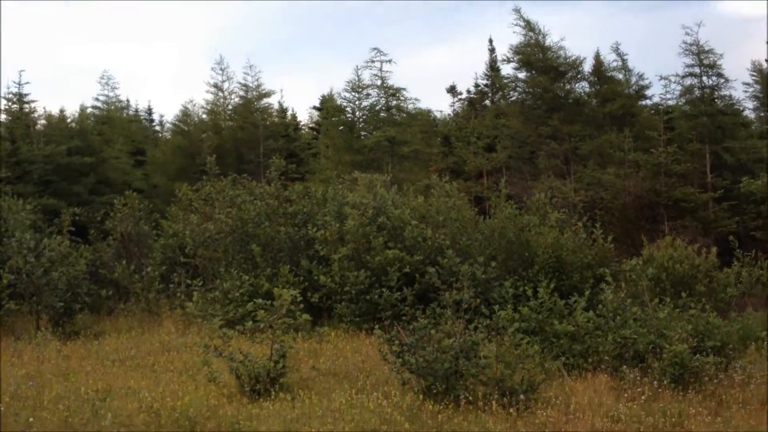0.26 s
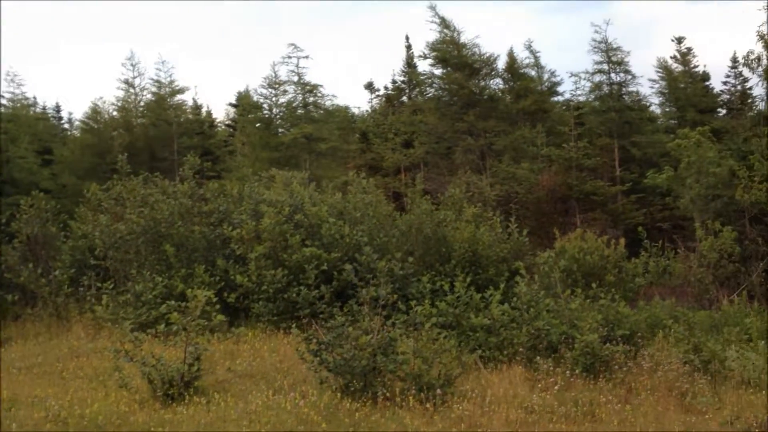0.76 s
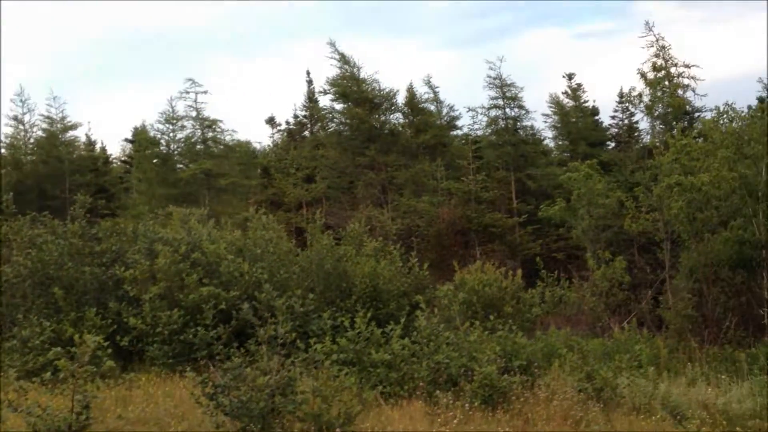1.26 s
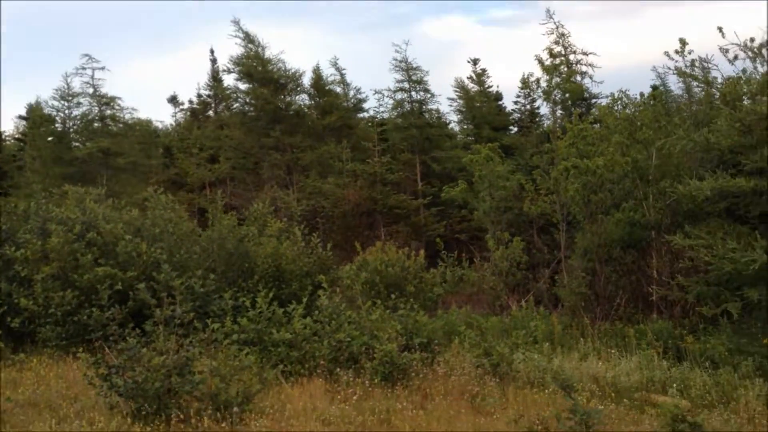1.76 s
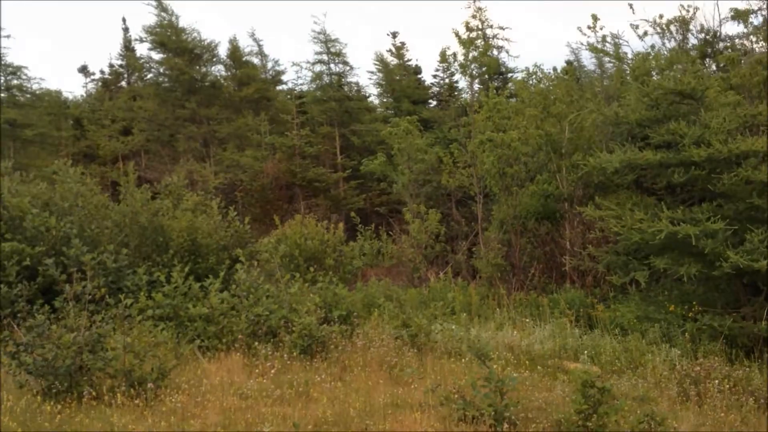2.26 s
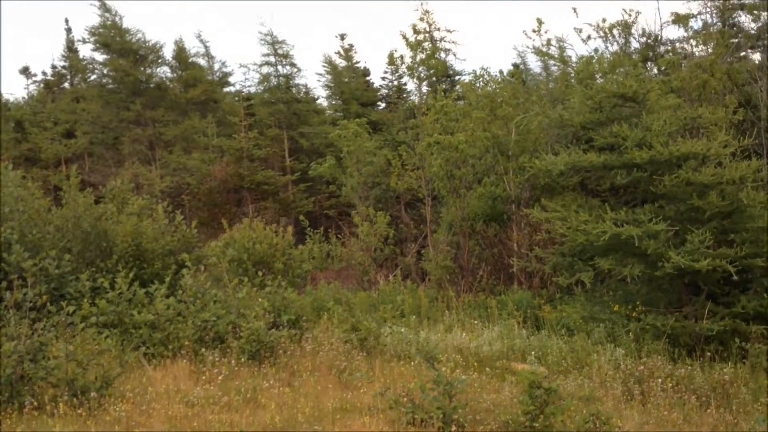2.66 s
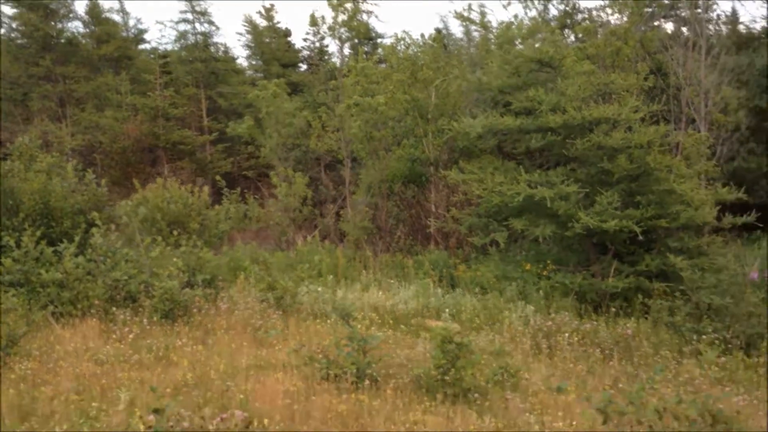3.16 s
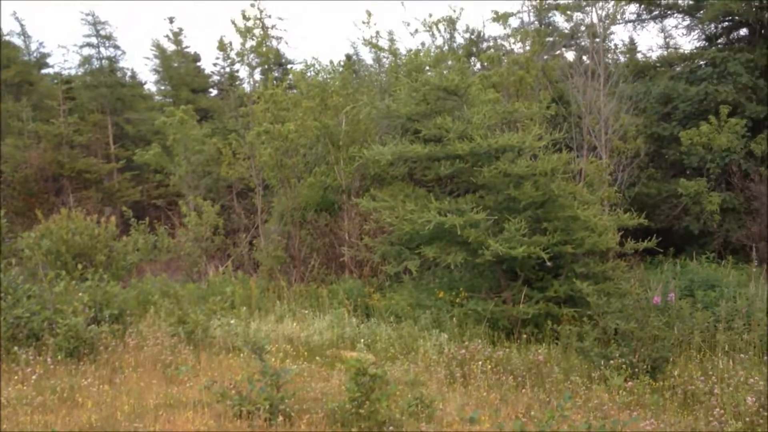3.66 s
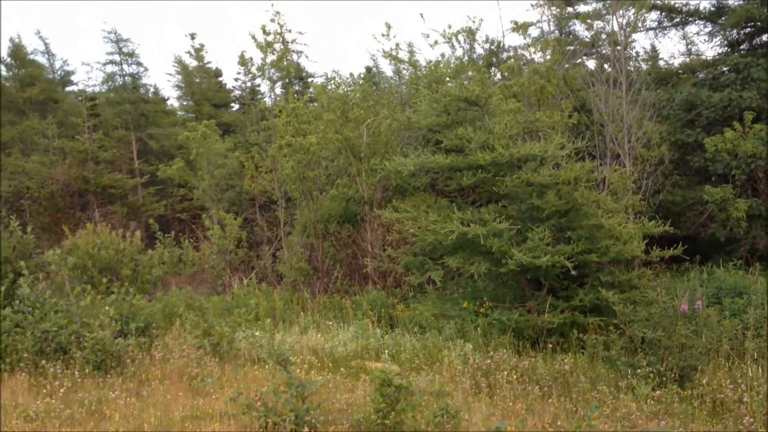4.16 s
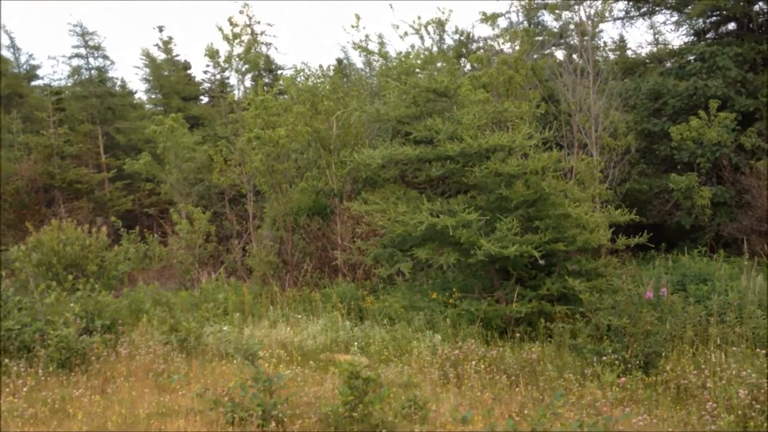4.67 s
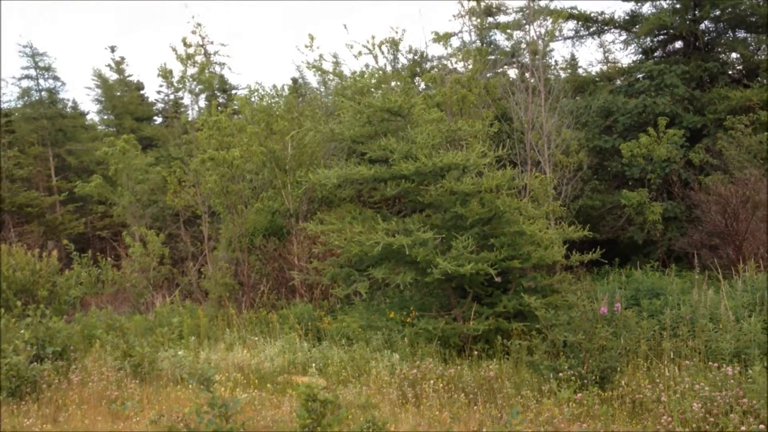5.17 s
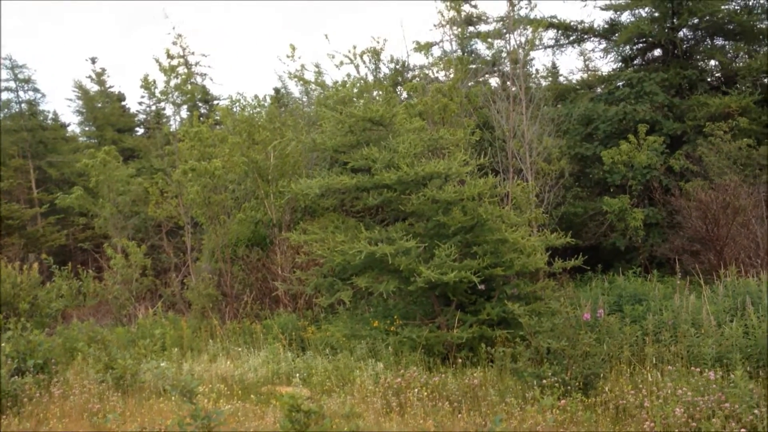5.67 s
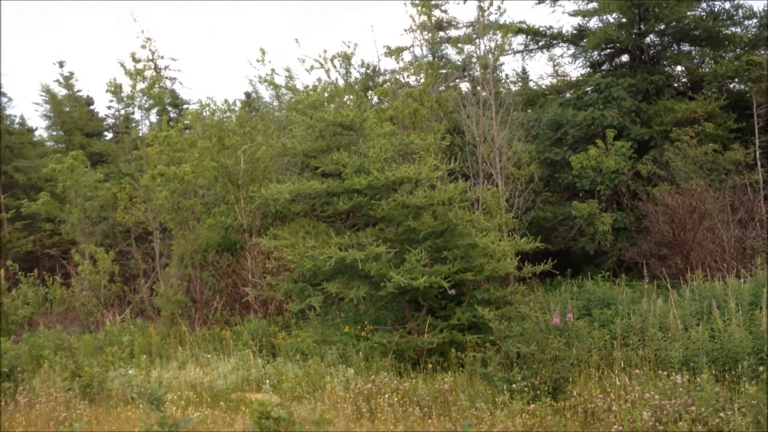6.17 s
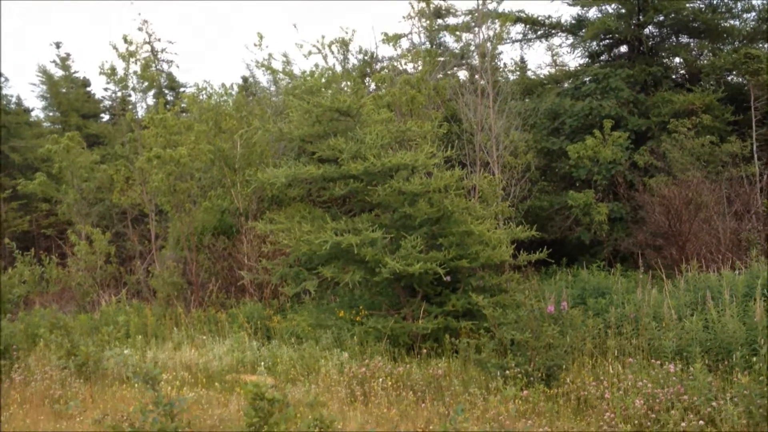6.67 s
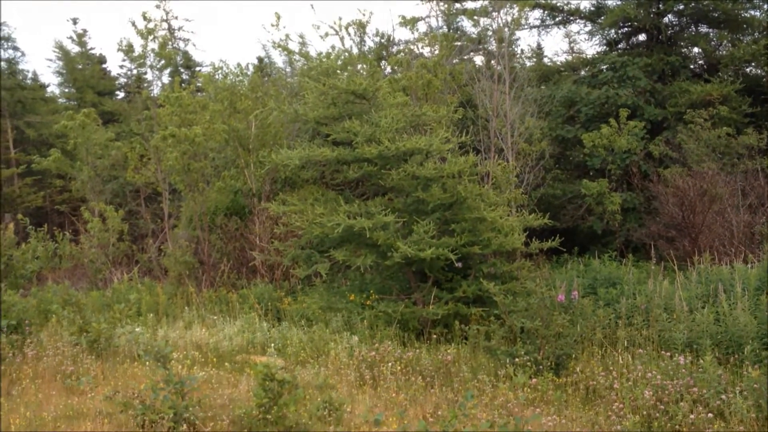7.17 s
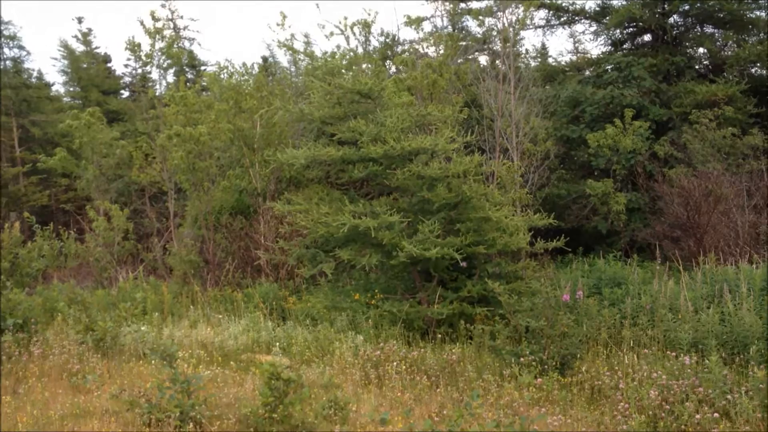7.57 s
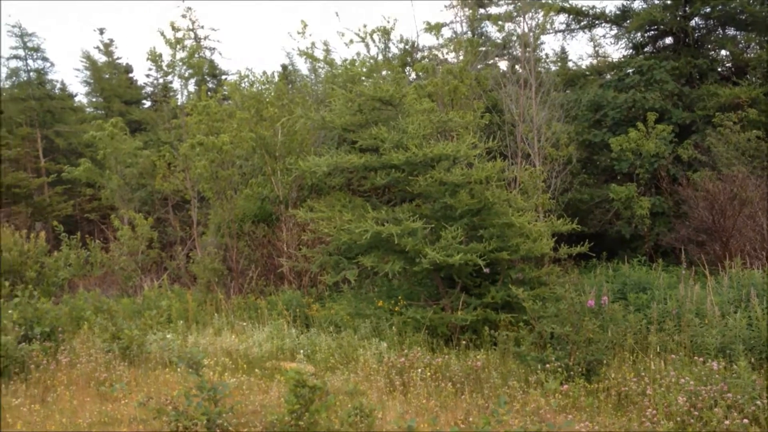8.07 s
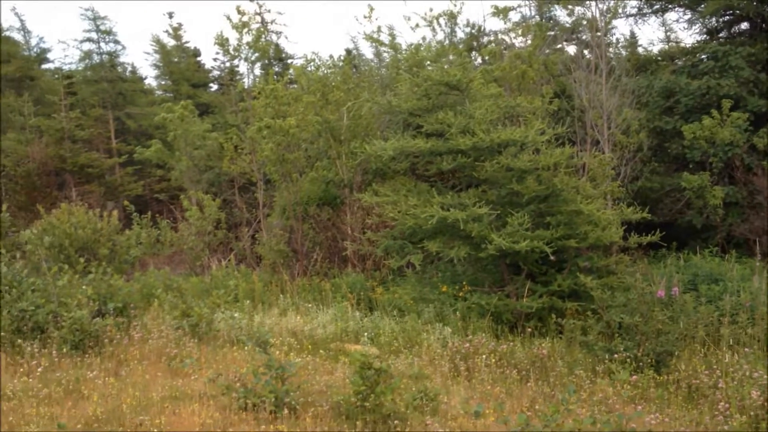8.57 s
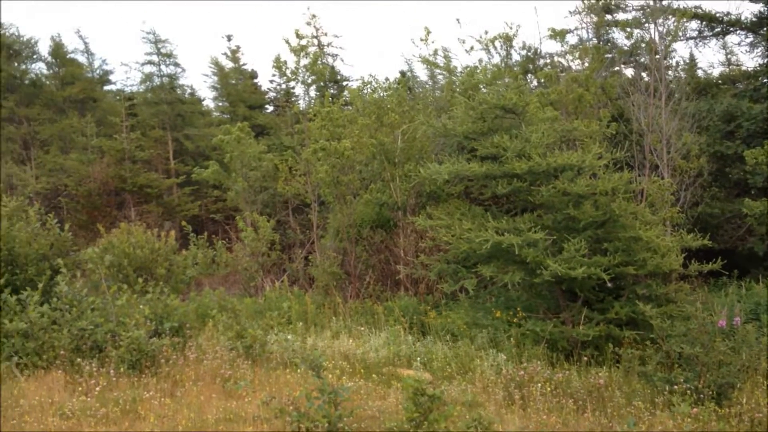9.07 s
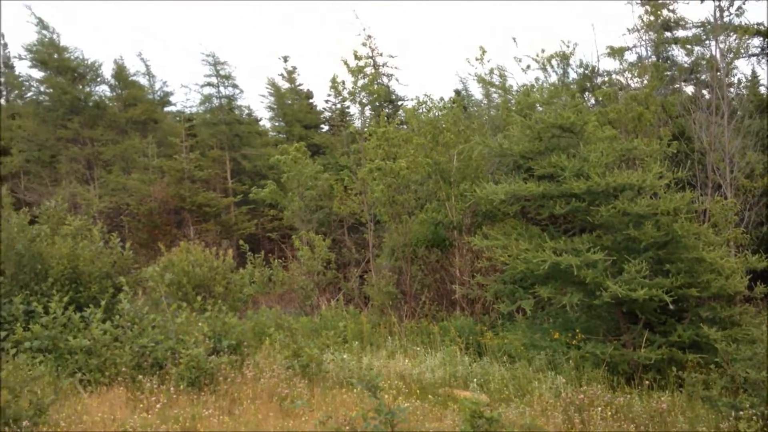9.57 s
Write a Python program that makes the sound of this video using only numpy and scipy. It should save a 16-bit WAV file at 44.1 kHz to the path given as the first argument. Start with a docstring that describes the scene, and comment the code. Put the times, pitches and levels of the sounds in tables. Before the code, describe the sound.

Hoarse, drawn-out hound howls break into thin squeals and ring through the woods, between quiet gaps with small birds and soft microphone bumps.

```python
"""Young hounds baying in the brush

Hounds bay at the edge of a wood: long falling howls, built from vocal-fold harmonics, turn hoarse with
growl and rasp and break into a second, whistling voice of gliding tones. Sparse echoes scatter the
calls among the trees and ring on. Birds chip in high glides; shaped noise makes rustling leaves, scuffs
and air; puffs bump the microphone with short dull swings, and small hollow knocks ring in the brush."""
import sys
import numpy as np
from scipy import signal
from scipy.fft import rfft, irfft, next_fast_len
from scipy.io import wavfile

SR = 44100
rng = np.random.default_rng(int(sys.argv[2]) if len(sys.argv) > 2 else 0)


def waveform_to_disk(signal):
    """Save audio, clipped to [-1, 1], as 16-bit WAV at the path in sys.argv[1]."""
    frames = np.transpose(np.atleast_2d(signal))
    scaled = np.clip(frames, -1, 1) * 32767
    samples = np.round(scaled).astype(np.int16)
    wavfile.write(sys.argv[1], SR, samples)


N = 433062
TIME = np.arange(N) / SR


def amp(db):
    """Decibels to gain."""
    return 10 ** (np.asarray(db) / 20)


def unit(x):
    """Scales to rms 1."""
    return x / np.sqrt(np.mean(x ** 2) + 1e-20)


def read(points, hz):
    """Reads a spectrum or decay table on a log-frequency axis."""
    f, value = np.transpose(points)
    return np.interp(np.log(hz + 1), np.log(f + 1), value)


def curves(rows):
    """Time axis of a table, then each of its columns sample by sample."""
    s, *columns = np.transpose(rows)
    t = np.arange(s[0], s[-1], 1 / SR)
    return [t] + [np.interp(t, s, column) for column in columns]


def add(mix, s, sound):
    """Mixes a sound in at time s."""
    part = mix[max(round(s * SR), 0):][:len(sound)]
    part += sound[:len(part)]


def noise(size=N):
    """White noise."""
    return rng.standard_normal(size)


def colour(x, points):
    """Gives x a spectrum, at rms 1."""
    size = next_fast_len(len(x))
    gain = amp(read(points, np.fft.rfftfreq(size, 1 / SR)))
    return unit(irfft(rfft(x, size) * gain, size)[:len(x)])


def wobble(size, hz):
    """Random motion, mostly slower than the given rate, at rms 1."""
    smooth = signal.butter(2, hz, fs=SR, output="sos")
    return unit(signal.sosfilt(smooth, noise(size + SR // 10))[-size:])


def fade(t, edge):
    """Straight fade-in and fade-out, each edge seconds long."""
    return np.clip(np.minimum(t - t[0], t[-1] - t) / edge, 0, 1)


# colour of still air and microphone hiss: f/Hz, relative level/dB
AIR_COLOUR = [(18, -40), (35, -23), (65, -20.5), (130, 1.5), (330, 1), (450, -0.5), (620, -1), (900, -3.5),
              (2000, -8.5), (3600, -10), (5500, -12), (10500, -18.5), (13000, -15), (15200, -12)]


def air(level_db=-68, sway_db=-0.64):
    """A faint, gently swaying hush of coloured noise."""
    return amp(level_db + sway_db * wobble(N, 3.6)) * colour(noise(), AIR_COLOUR)


# gusts on the microphone: t/s, rise/s, fall/s, strength/dB
GUST_SWELLS = [(3.3, 0.066, 0.21, -60), (4.6, 0.14, 0.12, -71), (6.44, 0.07, 0.48, -67),
               (7.05, 0.31, 0.43, -74.5)]


def breeze(calm_db=-89.5):
    """Strength of the breeze: each gust swells and dies away over the calm."""
    strength = amp(calm_db)
    for s, rise, fall, db in GUST_SWELLS:
        swell = np.exp(-np.maximum((s - TIME) / rise, (TIME - s) / fall))
        strength = strength + amp(db) * swell
    return strength


def rumble(flutter_db=5):
    """The breeze rumbles in lumps: low noise that flutters in strength."""
    low = colour(noise(), [(20, -42.5), (60, -4), (130, 0.0), (220, -5.5), (330, -31), (900, -61.5)])
    return breeze() * unit(low * amp(flutter_db * wobble(N, 9.3)))


# the strongest puffs of air, ahead of the microphone's bass cut: t/s, level/dB
PUFFS = [(3.254, -43.5), (3.311, -46.5), (3.345, -40), (3.44, -43.5), (4.578, -52), (4.648, -55.5),
         (6.458, -44), (7.119, -54), (7.506, -53), (7.639, -57)]


def bumps(bump_hz=150, length=0.0023):
    """Each puff of air gives a brief dull swing under a bell-shaped envelope; length in s."""
    out = np.zeros(N)
    t = np.arange(-SR // 20, SR // 20) / SR
    for s, db in PUFFS:
        swing = np.cos(2 * np.pi * (bump_hz * t + rng.random()))
        add(out, s + t[0], amp(db) * swing / np.cosh(t / length))
    return out


def wind():
    """Rumble and bumps through a microphone that hardly passes the deepest bass."""
    bass_cut = signal.butter(2, 60, "high", fs=SR, output="sos")
    return signal.sosfilt(bass_cut, rumble() + bumps())


# swells of rustling leaves: middle t/s, half length/s, level/dB
LEAF_SWELLS = [(6.3, 0.57, -83), (7.907, 0.76, -68.5), (8.756, 0.24, -71.5)]
# colour of the leaves: f/Hz, relative level/dB
LEAF_COLOUR = [(300, -7), (1500, 4), (3000, -2), (4200, -5), (6000, -7), (8000, -6), (10500, -21),
               (15000, -14)]


def rustles(grain_db=3, grain_hz=300):
    """Soft, bright swells of leaves brushing each other: grainy noise."""
    swell = sum(amp(db) * np.exp(-((TIME - s) / half) ** 2) for s, half, db in LEAF_SWELLS)
    grains = noise() * amp(grain_db * wobble(N, grain_hz))
    return swell * colour(grains, LEAF_COLOUR)


# scuffs and rustles close by: t/s, length/s, level/dB
SCUFF_STROKES = [(0.216, 0.054, -47), (0.068, 0.0085, -58.5), (4.294, 0.051, -63), (4.683, 0.055, -71),
                 (5.233, 0.11, -75), (5.555, 0.022, -65.5)]
# colour of the friction: f/Hz, relative level/dB
FRICTION_COLOUR = [(60, -32), (250, 2), (600, 5.5), (2000, -0.5), (3000, -4), (4400, -8.5), (5500, -22.5),
                   (8000, -19.5), (15000, -43)]


def scuffs(grain_db=3):
    """Short grainy strokes of friction."""
    out = np.zeros(N)
    for s, length, db in SCUFF_STROKES:
        size = int(length * SR)
        grains = noise(size) * amp(grain_db * wobble(size, 470))
        stroke = signal.windows.tukey(size, 0.6)
        add(out, s, amp(db) * stroke * colour(grains, FRICTION_COLOUR))
    return out


# small hollow knocks in the brush: t/s, f/Hz, level/dB
BRUSH_KNOCKS = [(4.33, 292, -57.5), (5.255, 638, -59), (5.563, 463, -56.5), (9.435, 718, -60)]


def knocks(t60=0.067, rise=0.0049):
    """One woody mode rings briefly at each knock; decay by 60 dB and rise in s."""
    out = np.zeros(N)
    t = np.arange(SR // 4) / SR
    for s, hz, db in BRUSH_KNOCKS:
        ring = (1 - np.exp(-t / rise)) * np.sin(2 * np.pi * hz * t)
        add(out, s, 2 * amp(db - 60 * t / t60) * ring)
    return out


# decay of the tail among the trunks: f/Hz, time to fall by 60 dB/s
TRUNK_T60 = [(400, 0.99), (1100, 1.06), (2100, 0.84), (4000, 0.46), (8000, 0.073)]


def woods(x, near_db=-9, near_t60=0.24, far_db=-14, far_rise=0.0092, scatter_hz=680):
    """Nearby brush scatters the sound almost at once; the trunks behind it return a long tail."""
    t = np.arange(SR * 3 // 2) / SR
    # sparse random echoes, about 2500 a second
    near, far = rng.standard_normal((2, len(t))) * (rng.random((2, len(t))) < 2500 / SR)
    near *= amp(-60 * t / near_t60) * (t > 0.004)
    # each frequency of the tail dies at its own pace
    hz, frame_s, bins = signal.stft(far * (1 - np.exp(-t / far_rise)), SR, nperseg=256)
    decay = amp(-60 * frame_s / read(TRUNK_T60, hz)[:, None])
    far = signal.istft(bins * decay, SR, nperseg=256)[1][:len(t)]
    echoes = amp(near_db) * near / np.linalg.norm(near) + amp(far_db) * far / np.linalg.norm(far)
    # twigs hardly scatter low notes
    echoes = signal.sosfilt(signal.butter(3, scatter_hz, "high", fs=SR, output="sos"), echoes)
    return x + signal.fftconvolve(x, echoes)[:N]


# bird notes: t/s, length/s, first f/Hz, last f/Hz, level/dB, depth of the warble/Hz
BIRD_NOTES = [(0.2, .03, 8460, 7600, -67, 2), (1.136, 0.15, 6970, 7300, -77, -3),
              (1.325, 0.17, 7250, 7460, -75.5, 108), (1.506, 0.2, 7430, 7420, -74, -5),
              (3.223, 0.032, 8420, 7600, -74, -16), (3.627, 0.19, 4100, 3850, -77, -6),
              (3.807, .17, 7580, 7310, -68.5, 372), (4.084, 0.1, 7720, 7400, -67.5, 274),
              (7.367, 0.052, 7450, 6670, -82, 0), (8.864, 0.037, 8650, 6200, -55.5, 2)]


def chip(s, length, first_hz, last_hz, level_db, warble_hz, jitter=0.02, flicker_db=3):
    """A small bird's thin, buzzy glide: a sine with a warble, a shaky pitch and a flickering level."""
    t = np.arange(0, length, 1 / SR)
    glide = first_hz + (last_hz - first_hz) * t / length
    hz = glide + warble_hz * np.cos(2 * np.pi * 18.3 * t)  # warble rate 18.3 Hz
    arch_db = -4.5 * (2 * t / length - 1) ** 2  # louder in the middle than at the ends
    phase = 2 * np.pi * np.cumsum(hz * (1 + jitter * wobble(len(t), 400))) / SR
    tone = unit(np.sin(phase) * amp(flicker_db * wobble(len(t), 60)))
    return s, amp(level_db + arch_db) * fade(t, 0.012) * tone


# colour of the hoarse rasp, in the bays and in their ring: f/Hz, relative level/dB
RASP_COLOUR = [(40, -80), (300, -52), (480, -26.5), (620, -3.5), (760, -10), (1050, -2), (1400, -7),
               (1800, -12.5), (2150, -7), (2650, -16.5), (2950, -45.5), (3500, -35.5), (4100, -41),
               (5000, -49.5), (7300, -43), (11000, -65)]


def dying_bay(level_db=-52, t60=1.29, squeal_hz=1290, squeal_width_hz=45, squeal_db=-4):
    """The ring of an earlier hoarse bay and of its squeal dies away among the trees."""
    squeal_ring = unit(wobble(N, squeal_width_hz) * np.sin(2 * np.pi * squeal_hz * TIME))
    ring = colour(noise(), RASP_COLOUR) + amp(squeal_db) * squeal_ring
    return amp(level_db - 60 * TIME / t60) * ring


# squeals, the thin second voice:
# t/s, rise/s, fall/s, first f/Hz, last f/Hz, level/dB, octave overtone level/dB
SQUEAL_NOTES = [(0.828, 0.02, 0.0095, 1270, 1014, -39.5, -5.5), (1.875, 0.023, .052, 1045, 985, -42, -4),
                (3.395, 0.017, 0.069, 1236, 827, -32, -24), (5.919, 0.014, 0.11, 1180, 1427, -40.5, -5),
                (6.25, 0.05, .06, 1366, 1265, -43.5, -15), (6.639, 0.083, .12, 1250, 1352, -49, -3),
                (7.401, 0.012, 0.063, 992, 991, -39.5, -19), (7.618, .012, .055, 1270, 1290, -57, -17),
                (7.711, 0.1, .16, 1375, 1290, -47.5, -9), (7.885, 0.0345, .33, 1411, 1265, -33, -18)]


def squeal(s, rise, fall, first_hz, last_hz, level_db, octave_db, jitter=0.016):
    """A nearly pure, unsteady tone with its octave, gliding toward its last pitch."""
    t = np.arange(0, rise + fall, 1 / SR)
    # the time constant of the glide is a share of the length
    hz = last_hz + (first_hz - last_hz) * np.exp(-t / (0.27 * t[-1]))
    swell_db = -25 * np.maximum(1 - t / rise, (t - rise) / fall)
    phase = 2 * np.pi * np.cumsum(hz * (1 + jitter * wobble(len(t), 120))) / SR
    tone = unit(np.sin(phase) + amp(octave_db) * np.sin(2 * phase))
    return s, amp(level_db + swell_db) * fade(t, 0.0046) * tone


# the voice breaks into hoarseness: middle t/s, half length/s, roughness added (0-1)
VOICE_BREAKS = [(0.998, .025, 0.33), (1.187, 0.067, 0.18), (1.467, 0.097, 0.15), (3.019, 0.053, 0.4),
                (3.442, .04, 0.19), (6.079, 0.11, 0.25), (6.298, 0.085, .54), (6.574, 0.13, 0.52),
                (6.995, 0.14, 0.13), (7.685, 0.21, 0.44), (7.886, 0.018, 0.37), (8.094, 0.096, 0.12)]


def hoarseness(t, clear=0.028, long_bay_s=0.3):
    """Roughness through a bay: at its start, at its end and wherever the voice breaks."""
    # the folds catch roughly, then settle
    start = 0.5 * np.exp((t[0] - t) / 0.021)
    # they rattle again as the air runs out, less so after a short bay
    spent = min((t[-1] - t[0]) / long_bay_s, 1)
    end = spent * 0.66 * np.exp(-((t[-1] - t) / 0.071) ** 2)
    breaks = sum(depth * np.exp(-((t - s) / half) ** 2) for s, half, depth in VOICE_BREAKS)
    return np.clip(clear + start + end + breaks, 0, 0.95)


# colour of the clear voice: f/Hz, relative level/dB
THROAT_COLOUR = [(520, -2), (1050, 4), (1560, 6), (1740, -5), (2150, 4.5), (2330, -7), (2650, -12.5),
                 (2980, -32.5), (3180, -26), (3400, -38.5), (3700, -34), (4150, -30.5), (4700, -50),
                 (5900, -52.5), (7200, -51), (12000, -69.5)]


def clear_voice(hz, turns, rough, chest_db, mouth_db, top_db,
                press_db=45, waver_db=4.0, waver_hz=11, smear=0.26):
    """Eighteen harmonics of the vocal folds, shaped by the throat and mouth and smeared when hoarse."""
    size = len(hz)
    k = np.arange(1, 19)[:, None]
    # the harder the hound presses, the higher the pitch and the stronger the top harmonics
    pressed_db = top_db + press_db * np.log(hz / 530)
    # the open mouth lifts the fourth and fifth harmonics most
    mouth = np.interp(k, [2, 4, 5, 7], [0, 1, 1, 0.25])
    shares_db = chest_db * (k == 1) + mouth_db * mouth + pressed_db * (k >= 6)
    # each overtone wavers in strength on its own
    shares_db = shares_db + waver_db * (k > 1) * np.array([wobble(size, waver_hz) for _ in k])
    gains = amp(read(THROAT_COLOUR, k * hz) + shares_db)
    gains /= np.sqrt((gains ** 2).sum(0) / 2)
    gains[1:] *= np.sqrt(1 - rough ** 2)
    # uneven cycle timing smears the overtones and spares the fundamental
    scatter = 2 * np.sqrt(k - 1) * smear * rough ** 2 * wobble(size, 100)
    # the throat delays each harmonic by its own amount
    delay = rng.random(k.shape)
    return (gains * np.cos(2 * np.pi * (k * turns + scatter + delay))).sum(0)


def growl(hz, turns, mouth_db, rasp, split_hz=36):
    """Strong and weak cycles alternate by fits: unsteady tones halfway between the harmonics."""
    size = len(hz)
    out = 0
    for half in np.arange(1, 6) + 0.5:
        fits = wobble(size, split_hz) + 1j * wobble(size, split_hz)
        opening_db = 0.14 * mouth_db * np.log(half / 2)  # an open mouth brightens the growl too
        tone = (fits * np.exp(2j * np.pi * half * turns)).real
        out = out + amp(read(rasp, half * hz) + opening_db) * tone
    return unit(out)


# one table a bay: t/s, f/Hz before the opening scoop, level/dB,
# boost of the fundamental/dB, brightness of the mouth/dB
BAY_CURVES = [
    [(0.84, 595.4, -36, 1, 16), (0.964, 576, -33, 13, 7), (1.01, 514.4, -40, 18, 15.5),
     (1.061, 566.0, -34.5, -5, 3), (1.141, 526, -35.0, -1, 4.0), (1.269, 509.8, -37.5, 6, -3.5),
     (1.325, 526, -37.5, 1.5, 9), (1.526, 499.3, -37, -8, -14), (1.62, 492.4, -47.5, -10.5, -18.5)],
    [(2.06, 541, -39.5, -10.5, -2.5), (2.137, 567, -31.5, -5, 10.5), (2.181, 532.4, -31, -6.5, -7),
     (2.435, 526, -34.0, -15.5, -11.5), (2.54, 533.8, -36.0, 0.5, 2), (2.661, 506.8, -29.5, -19.5, -11),
     (2.765, 526.6, -34, -0.5, 3.5), (2.884, 534.4, -31, -1.5, 4), (3.033, 508.4, -37, -8.5, -3),
     (3.15, 493, -46.5, -16, -26)],
    [(3.415, 509.0, -40, -15, 2), (3.485, 499.7, -37.5, -0.5, -6), (3.528, 534.2, -39.5, 7.5, -3.5),
     (3.62, 508, -44.5, 2, 11)],
    [(5.955, 594.8, -38.5, 7, 4), (6.084, 567, -39.5, 2, -2.5), (6.191, 562.7, -36, -5, -17),
     (6.302, 500.0, -41, -8, -10), (6.389, 582.2, -31, 0, 2), (6.467, 548.3, -33.5, -4, -13.5),
     (6.577, 526.5, -36.5, 9.5, -5), (6.74, 539, -40, 14, -2.5), (6.953, 494.8, -42, -10, 5),
     (7.091, 509.8, -41.0, 1, -1), (7.28, 492, -43.5, -16, 0.5)],
    [(7.42, 563.6, -41.5, -7.5, -2.5), (7.496, 562.7, -36.5, -13.5, 0.5), (7.57, 521.4, -34, -10.5, -15),
     (7.7, 528.8, -40.5, -15, -15.0), (7.839, 556.2, -40.5, -6, -9.5), (7.888, 515.5, -37, -6, 1),
     (7.924, 560.8, -39.5, 1, 6), (8.039, 514, -29.5, -10, -5.5), (8.091, 506.6, -41, -7.5, 1.5),
     (8.39, 493.7, -45, 0.5, 2.5)],
    [(8.958, 522, -42, -3, 3), (9.063, 529.3, -37.5, 10.5, -2.5), (9.2, 522.4, -48, 17, 1)],
]
# tone of each bay, in the same order:
# boost of the top harmonics/dB, boost of the air hiss/dB, tilt of the rasp/(dB per octave)
BAY_TONES = [(-3, -0.5, 1.5), (0, -2.5, 2.5), (2.5, 1, 2.5), (0.5, 2.5, -1), (-3, 1, -1.5), (0, 5, 0.5)]
# colour of the air hiss that rides on every bay: f/Hz, relative level/dB
HISS_COLOUR = [(100, -64.5), (1500, -31), (3200, -20.5), (4000, 0.5), (5000, -10), (6000, 2), (7400, 4),
               (9000, -6), (11000, -41)]


def bay(rows, top_db, airy_db, tilt_db, jitter=0.0043, split_db=-2.0, rasp_db=-2.5, hiss_db=-43,
        tear_db=4, attack=0.02, release=0.039):
    """Vocal folds buzz through the throat; when hoarse their cycles scatter, pair into a growl and rasp."""
    t, hz, level_db, chest_db, mouth_db = curves(rows)
    # every bay starts 13 % under its pitch and slides up
    hz = hz * (1 - 0.13 * np.exp((t[0] - t) / 0.02))
    size = len(t)
    rough = hoarseness(t)
    turns = np.cumsum(hz * (1 + jitter * wobble(size, 45))) / SR  # cycles of the folds
    folds = clear_voice(hz, turns, rough, chest_db, mouth_db, top_db)
    rasp = [(f, db + tilt_db * np.log2(f)) for f, db in RASP_COLOUR]
    # breath bursts through once a cycle
    puffs = noise(size) * (1 + 0.9 * np.cos(2 * np.pi * turns))
    hoarse = amp(split_db) * growl(hz, turns, mouth_db, rasp)
    hoarse = hoarse + amp(rasp_db) * rough * colour(puffs, rasp)
    # the rasp comes in torn bursts
    hoarse = rough ** 1.35 * hoarse * amp(tear_db * wobble(size, 38))
    hiss = amp(hiss_db + airy_db) * (1 + rough) * colour(puffs, HISS_COLOUR)
    # the voice trails off as the mouth shuts, its hoarse part faster
    closing = np.clip((t[-1] - t) / release, 0, 1)
    voice = folds + closing * hoarse + hiss
    return t[0], amp(level_db) * fade(t, attack) * closing * voice


def scene():
    """Hounds and birds among the trees, small noises at the microphone."""
    hounds, birds = np.zeros(N), np.zeros(N)
    for row in BIRD_NOTES:
        add(birds, *chip(*row))
    for row in SQUEAL_NOTES:
        add(hounds, *squeal(*row))
    for rows, tone in zip(BAY_CURVES, BAY_TONES):
        add(hounds, *bay(rows, *tone))
    distant = woods(hounds) + woods(birds, near_db=-6.5, far_db=-10.5) + dying_bay()
    return (air() + wind() + rustles() + scuffs() + knocks() + distant)[None]


def record(dry, edge_hz=15330):
    """The recorder's band limit: a steep low-pass."""
    low_pass = signal.firwin(511, edge_hz, window=("kaiser", 9), fs=SR)
    return signal.oaconvolve(dry, low_pass[None], "same")


dry = scene()
out = record(dry)
waveform_to_disk(out)
```